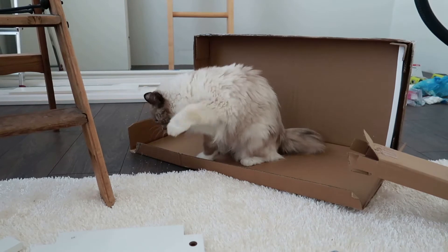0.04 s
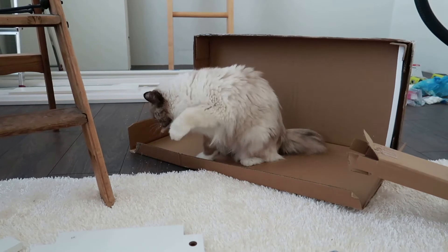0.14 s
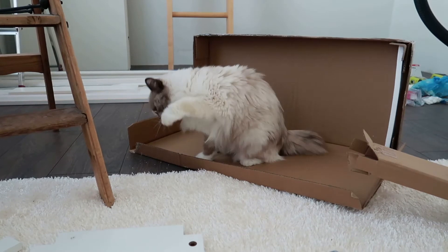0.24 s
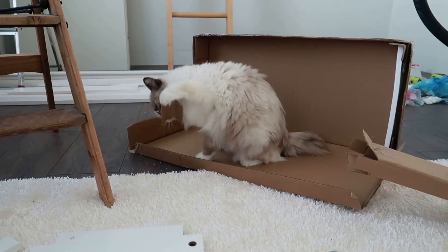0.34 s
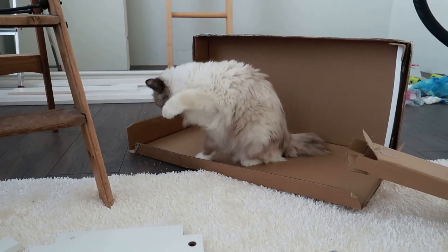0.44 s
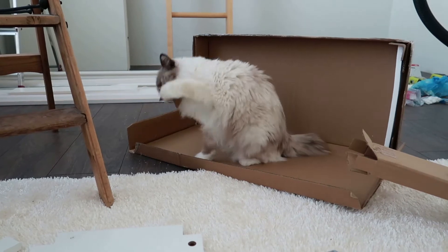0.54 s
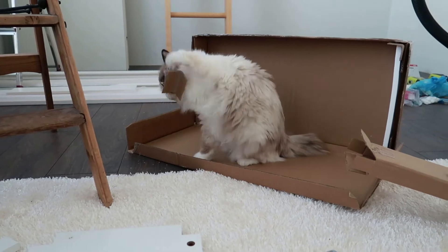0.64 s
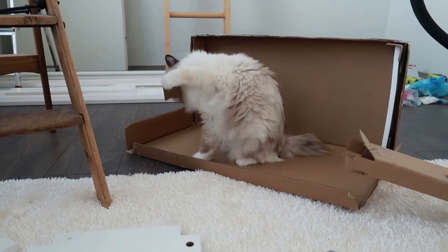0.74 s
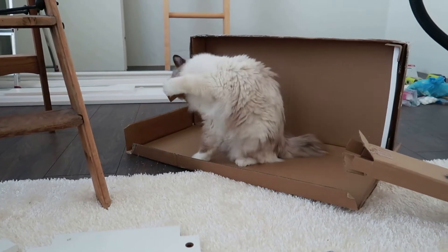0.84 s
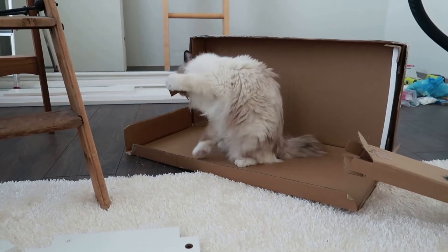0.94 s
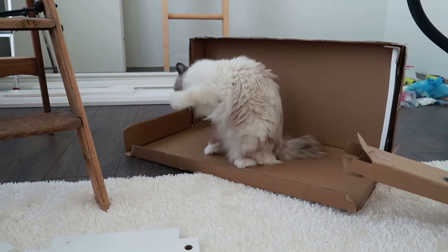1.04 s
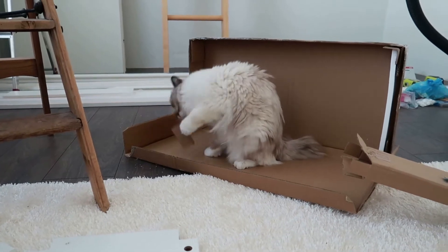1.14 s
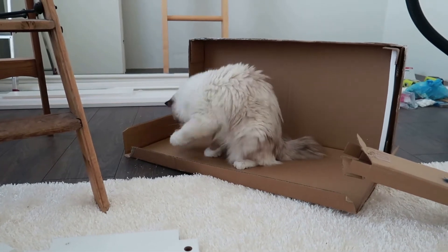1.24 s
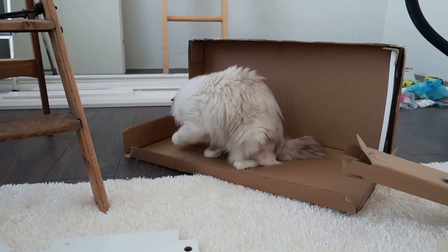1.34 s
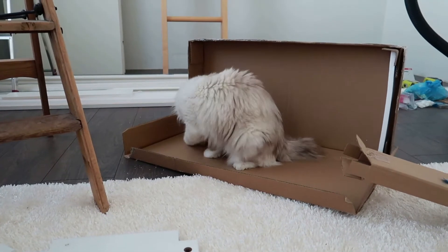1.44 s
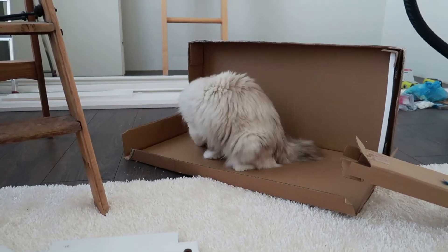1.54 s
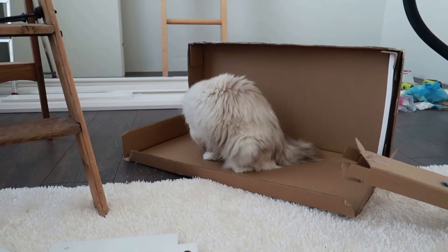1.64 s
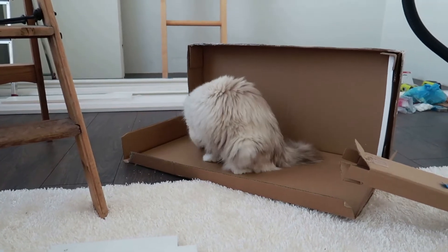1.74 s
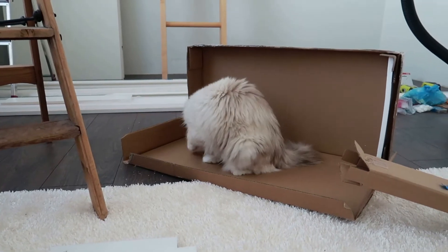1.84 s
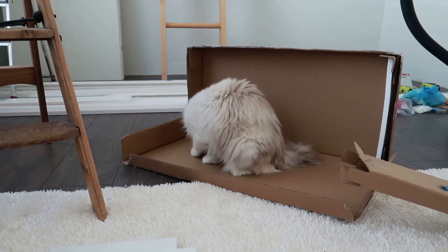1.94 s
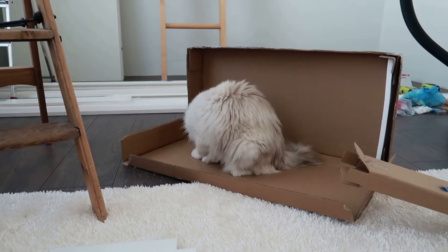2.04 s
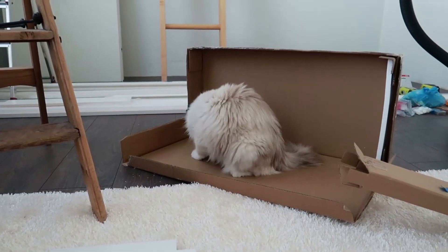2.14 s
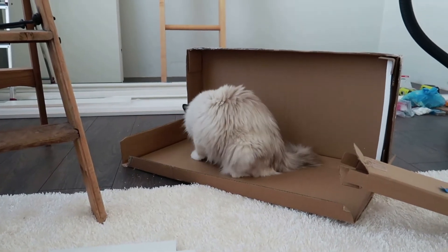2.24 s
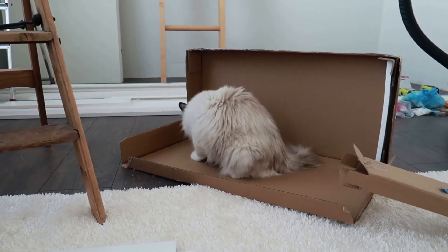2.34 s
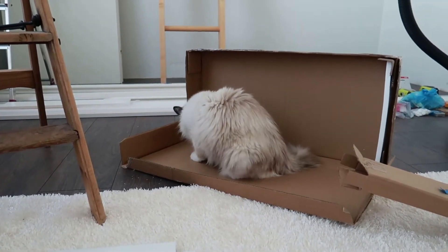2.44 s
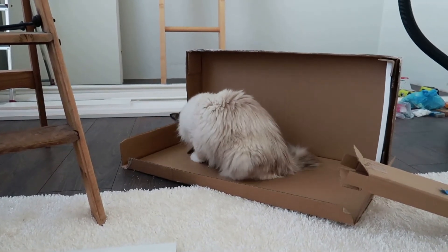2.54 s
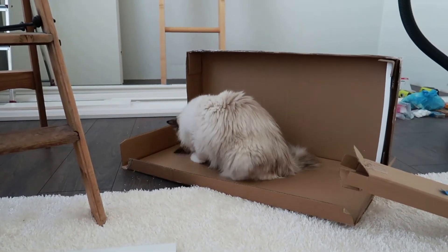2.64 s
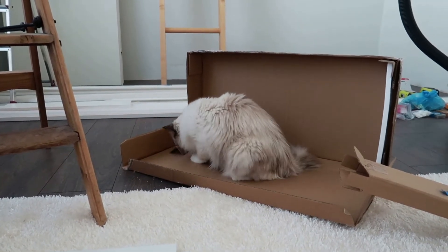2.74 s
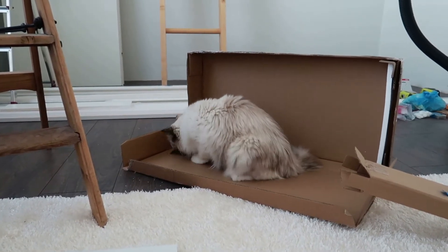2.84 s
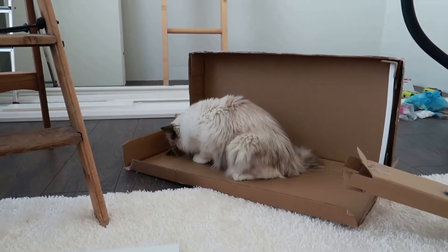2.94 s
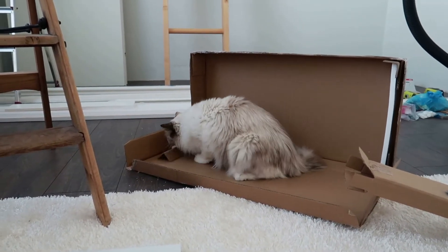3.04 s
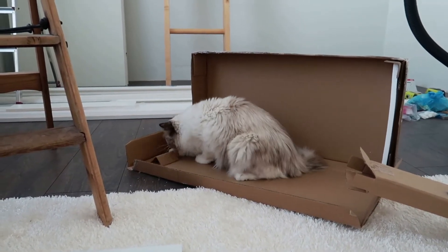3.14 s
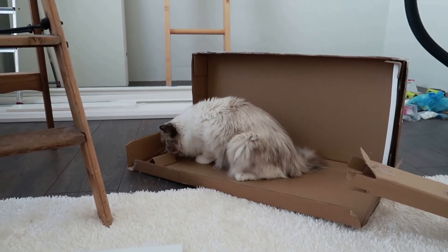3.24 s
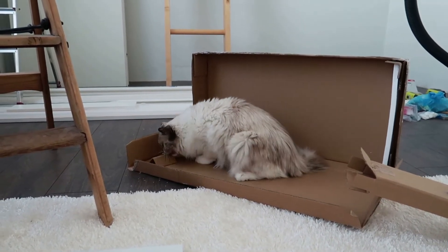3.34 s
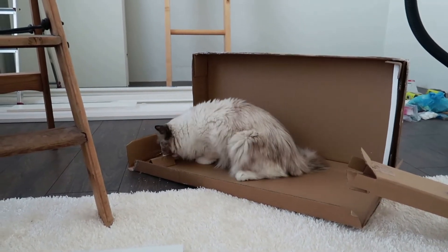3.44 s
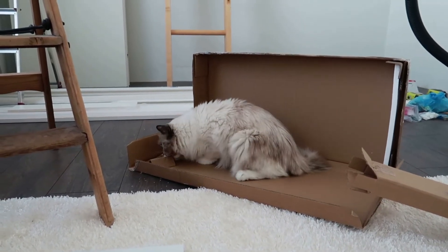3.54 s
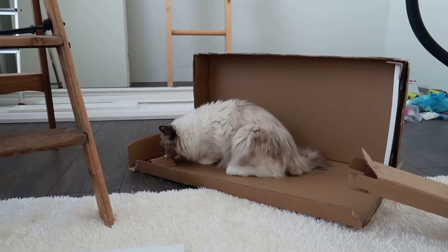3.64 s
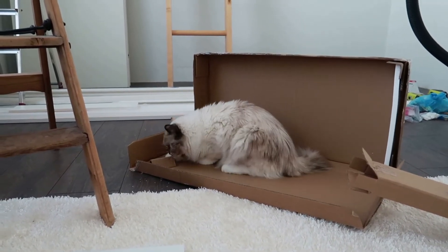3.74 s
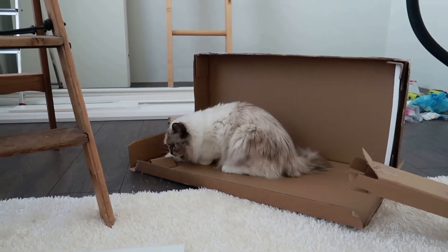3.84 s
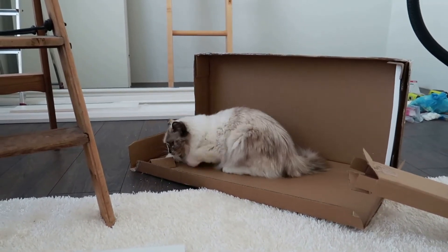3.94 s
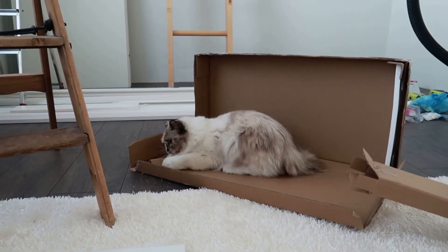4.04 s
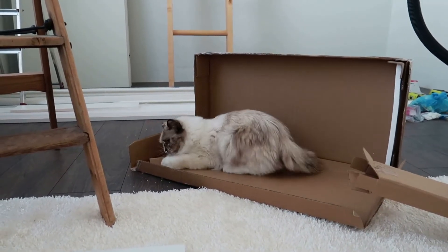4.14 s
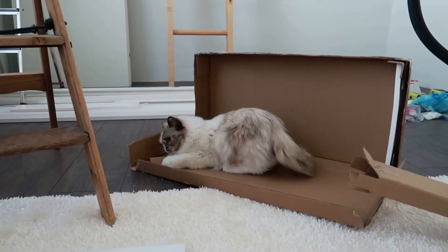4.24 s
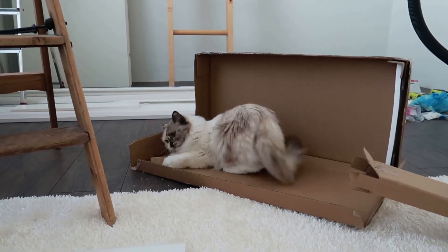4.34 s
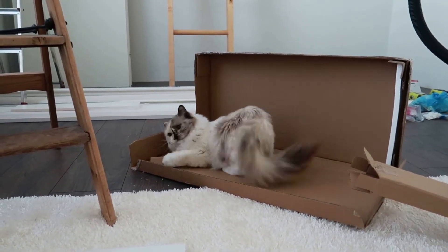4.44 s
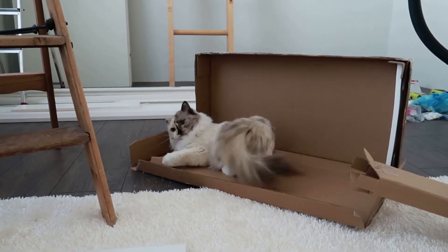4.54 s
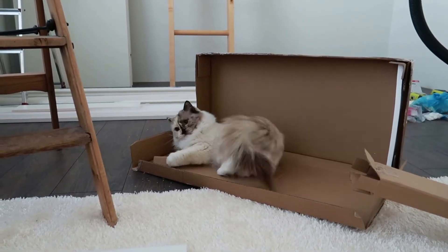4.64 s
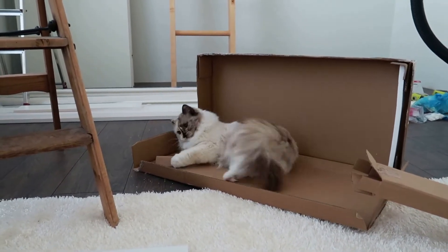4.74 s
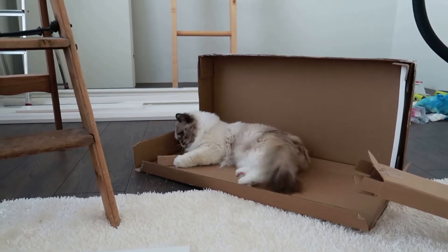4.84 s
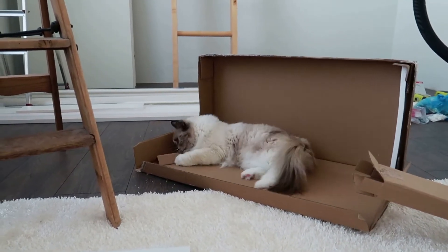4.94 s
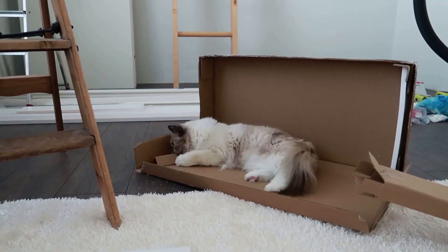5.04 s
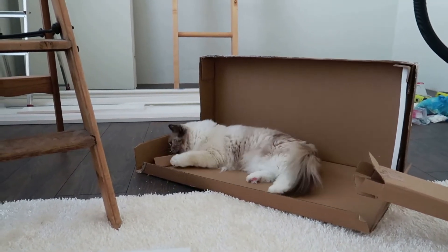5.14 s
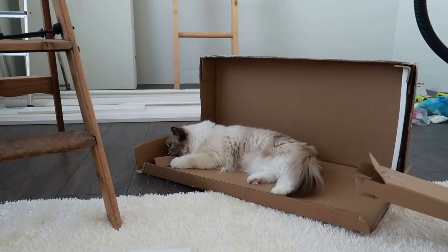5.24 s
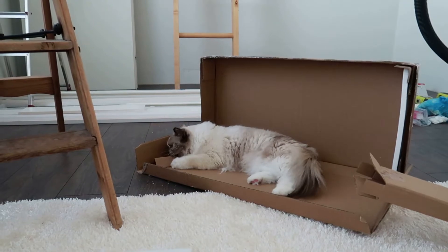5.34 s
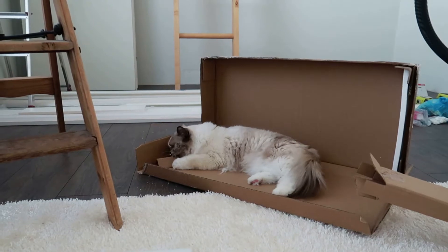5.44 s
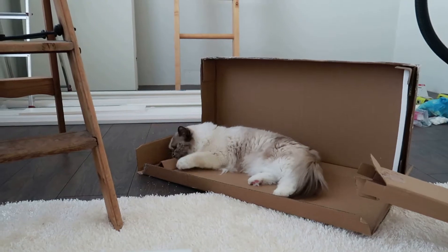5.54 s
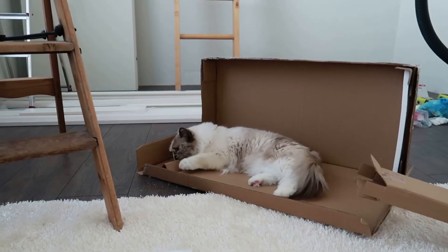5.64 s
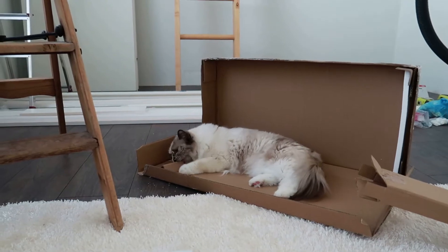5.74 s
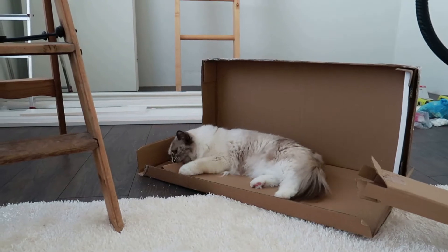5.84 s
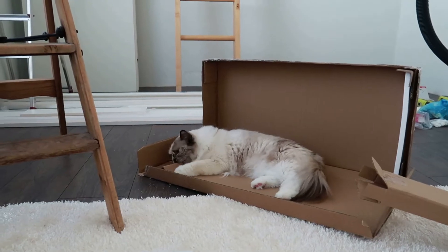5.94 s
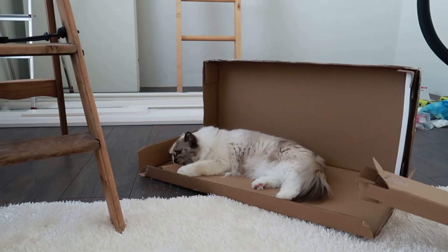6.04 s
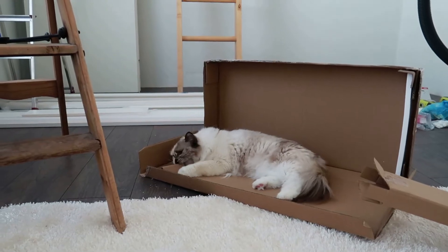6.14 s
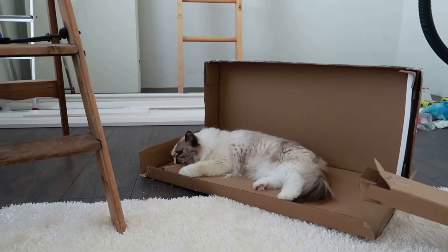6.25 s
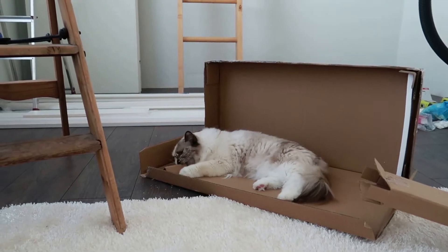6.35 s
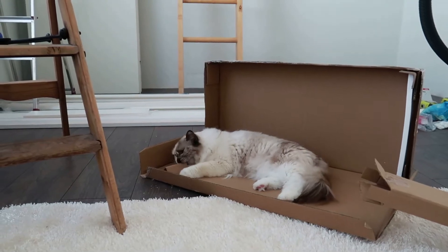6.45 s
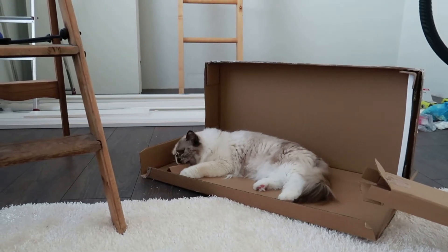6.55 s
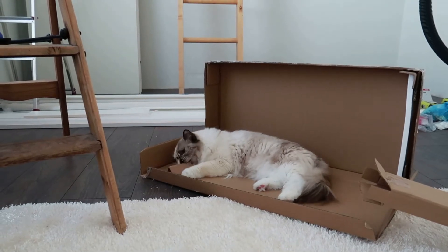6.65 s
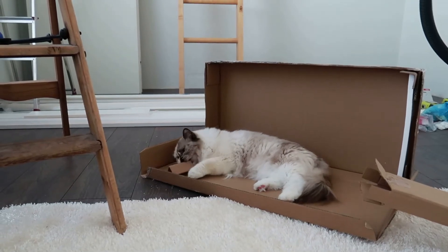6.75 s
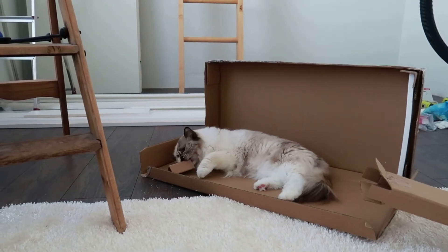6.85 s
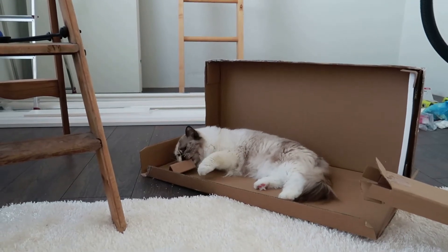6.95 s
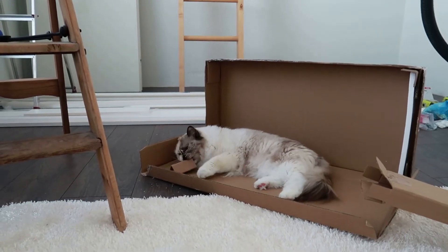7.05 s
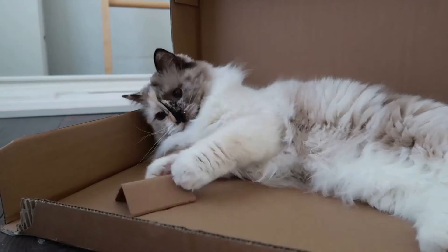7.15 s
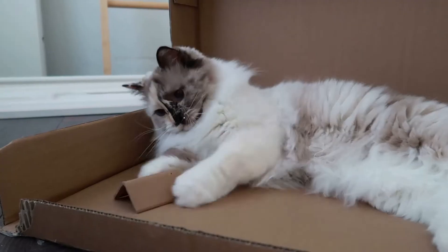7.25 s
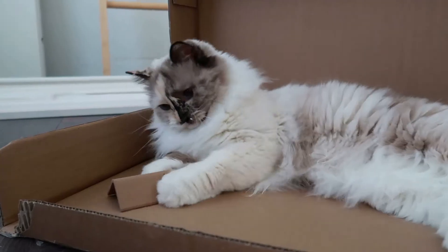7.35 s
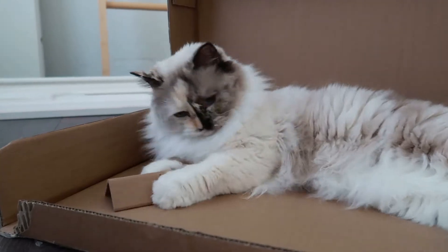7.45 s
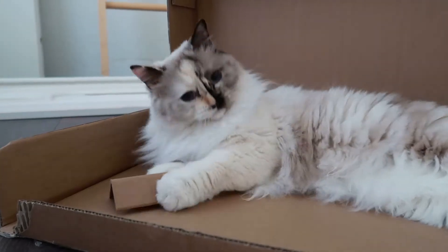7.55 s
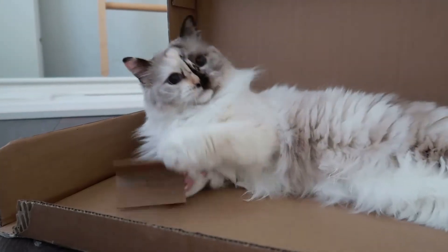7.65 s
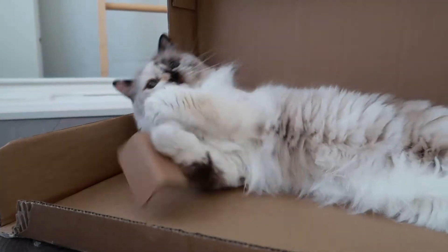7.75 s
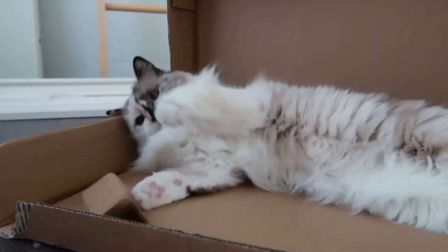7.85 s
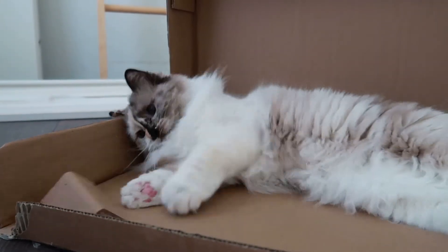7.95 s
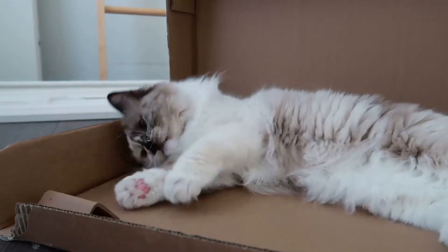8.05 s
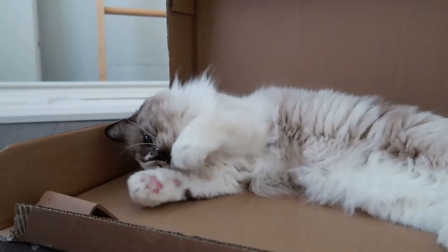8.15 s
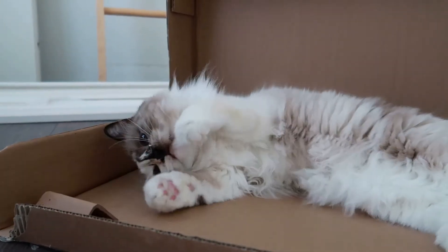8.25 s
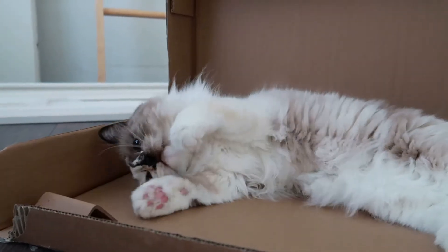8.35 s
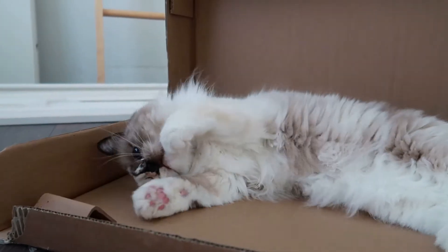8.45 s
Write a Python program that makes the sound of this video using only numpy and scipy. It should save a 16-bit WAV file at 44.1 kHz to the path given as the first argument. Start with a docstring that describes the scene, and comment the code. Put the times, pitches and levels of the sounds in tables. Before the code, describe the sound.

A paw thumps and scrapes hard on hollow cardboard, then soft fur rustles, and finally a loose folded piece is batted with rapid clacks.

```python
"""A cat paws and knocks on a shallow cardboard box on the floor of a bare room, and rubs its fur against it.
Each knock is a snap and some grit that ring the short modes of the board; later a loose folded piece is batted.
Claws tick on a stiff edge; fur and claws drag over the fibres as thousands of small slips a second.
Two close microphone ports hear the room as a diffuse field; air noise and mains hum lie below."""
import sys
import numpy as np
from scipy import signal
from scipy.fft import rfft, irfft, next_fast_len
from scipy.io import wavfile

SR = 44100
rng = np.random.default_rng(int(sys.argv[2]) if len(sys.argv) > 2 else 0)


def natural_amplitude(level_db):
    """Convert a level in decibels to a linear amplitude factor, elementwise."""
    exponent = np.asarray(level_db, float) / 20
    return 10 ** exponent


def to_wav(sig):
    """Store sig (one row per channel, or 1-D mono) as 16-bit WAV at the path in sys.argv[1].

    Samples outside -1..1 are clipped; the rate is SR.
    """
    pcm = np.clip(np.atleast_2d(sig), -1, 1) * 32767
    pcm = np.round(pcm).astype(np.int16)
    wavfile.write(sys.argv[1], SR, pcm.T)  # frames by channels


N = 375222  # samples
T = np.arange(N) / SR  # s
FREQ = np.maximum(np.fft.rfftfreq(N, 1 / SR), 10)  # Hz, kept above zero for the logarithms


def rms_one(x):
    """Scale to rms 1."""
    return x / np.sqrt(np.mean(x ** 2) + 1e-20)


def at_hz(points, hz):
    """Read a table on a log-frequency axis."""
    table_hz, value = np.transpose(points)
    return np.interp(np.log(hz), np.log(table_hz), value)


def shape(x, gain):
    """Weight the spectrum of a whole signal."""
    return irfft(rfft(x) * gain, N)


def drift(rate_hz):
    """Slow random wander of rms 1, made of noise that fades above rate_hz."""
    gain = 1 / (1 + (np.fft.rfftfreq(N, 1 / SR) / rate_hz) ** 2)
    return rms_one(shape(rng.standard_normal(N), gain))


def ring(drive, hz, t60):
    """A mode of the board: a unit click sets a decaying sine of starting height 1 ringing."""
    radius = natural_amplitude(-60 / (t60 * SR))
    turn = 2 * np.pi * hz / SR
    return signal.lfilter([0, np.sin(turn)], [1, -2 * radius * np.cos(turn), radius * radius], drive)


def diffuse(most_alike):
    """Sound from all sides: alike at both ports in the bass, unrelated or opposed in the treble."""
    port_gap_m, sound_speed = 0.017, 343  # m, m/s
    return most_alike * np.sinc(2 * FREQ * port_gap_m / sound_speed)


def at_ports(mid, side, alike):
    """Share two unrelated signals out so that the ports agree to the given degree at each frequency."""
    alike = np.clip(alike, -1, 1)
    mid = shape(mid, np.sqrt(1 + alike))
    side = shape(side, np.sqrt(1 - alike))
    return np.array([mid + side, mid - side]) / np.sqrt(2)


def lagged(x, left_lag_us, left_db):
    """Direct sound reaches the two ports with a small difference in time and in level."""
    half_lag = np.exp(-1j * np.pi * FREQ * left_lag_us * 1e-6)
    left = natural_amplitude(left_db / 2) * shape(x, half_lag)
    right = natural_amplitude(-left_db / 2) * shape(x, 1 / half_lag)
    return np.array([left, right])


def knocks(rows, modes, cut_hz):
    """Each knock is a snap followed by the grit of the contact; where it lands sets which modes ring."""
    # Centres of the three strengths of a knock, in Hz.
    share_hz = [250, 550, 1700]
    top_fall_db = -4.5  # per octave above the last centre
    t = T[:1024]
    starts = np.round(rows[:, 0] * SR).astype(int)
    contact_s = np.clip(rows[:, 4:], 0.05, 6) / 1000

    swell = t / contact_s * np.exp(-t / contact_s)
    grit = rng.standard_normal((len(rows), len(t))) * swell
    grit = grit / np.sqrt(np.sum(grit ** 2, axis=1, keepdims=True))
    grit_share = contact_s / (contact_s + 0.002)  # long contacts are mostly grit
    snap = -1.0 * (t == 0)
    force = np.sqrt(grit_share) * grit + np.sqrt(1 - grit_share) * snap

    out = np.zeros(N)
    for k, (hz, level_db, t60) in enumerate(modes):
        mode_db = top_fall_db * max(np.log2(hz / share_hz[-1]), 0) + level_db - 7.5
        drive = np.full(N + len(t), 1e-18)
        for start, row, push in zip(starts, rows, force):
            strength_db = np.interp(np.log(hz), np.log(share_hz), row[1:4])
            drive[start:start + len(t)] += natural_amplitude(strength_db + mode_db) * push
        sign = 1 if hz < 600 else (-1) ** k  # the low modes all start the same way: a thump
        out += sign * ring(drive[:N], hz, t60)
    # a thin sheet radiates no deep bass
    return signal.sosfilt(signal.butter(4, cut_hz, "high", fs=SR, output="sos"), out)


def ticks():
    """A claw tip lets go of a stiff edge: one click into a few bright modes."""
    # Each row: time in seconds (the click comes 1.5 ms later), relative strength in dB,
    # lean to the high modes in dB per octave.
    claw_rows = [(0.7953, -36.5, 7.5), (4.1696, -35.5, -10), (4.485, -41, -1), (5.3004, -32, -1.5)]
    # Modes of the edge. Each row: frequency in Hz, relative level in dB, decay by 60 dB in seconds.
    edge_modes = [(1365, -4, 0.073), (1510, 0.5, 0.045), (2080, 2, 0.036), (2520, -15, 0.018),
                  (3065, 6, 0.019), (3700, -10, 0.02)]
    s, strength_db, lean_db = np.transpose(claw_rows)
    at = np.round((s + 0.0015) * SR).astype(int)
    out = np.zeros(N)
    for k, (hz, level_db, t60) in enumerate(edge_modes):
        clicks = np.full(N, 1e-18)
        clicks[at] = natural_amplitude(strength_db + level_db - 10.0 + lean_db * np.log2(hz / 2000))
        out += (-1) ** k * ring(clicks, hz, t60)
    return out


def strokes():
    """Power of the four parts of the drag: each stroke swells to its strongest moment and falls away."""
    # Strokes of fur and claws. Each row: strongest moment in seconds, rise in seconds, fall in seconds,
    # relative level in dB, hollow part against the middle in dB, brightness against the middle in dB.
    stroke_rows = [(0.87, 0.069, .03, -61, 2, -5), (1.14, .015, 0.12, -59.5, 0.5, -15),
                   (1.281, 0.015, 0.15, -28, 2, -16), (1.404, 0.025, .12, -40.5, 10.5, -14),
                   (1.478, 0.022, 0.024, -46, 16.5, 0.5), (1.565, 0.073, .24, -31, 2.5, -10),
                   (2.05, 0.017, 0.17, -53.5, -3.5, -2), (2.44, .04, 0.3, -55, 7, 2.5),
                   (2.56, 0.2, 0.25, -55, -3, -13), (2.72, 0.34, 0.19, -48, 5, 1.5),
                   (3.0, 0.059, 0.57, -61.5, 8.5, 10), (3.24, 0.46, 0.15, -47, 1.5, -1),
                   (3.51, 0.073, 0.27, -52, 2.5, -1.5), (3.72, 0.094, 0.31, -63, 4.5, 6.5),
                   (4.05, 0.077, 0.23, -59.5, -1.5, -8), (4.189, 0.037, 0.14, -47, -10, -6.5),
                   (4.44, 0.028, 0.14, -64, -5, 12), (4.49, 0.018, 0.53, -49.5, -3.5, -5.5),
                   (4.74, 0.13, 0.17, -46, -4, -3.5), (4.96, 0.15, 0.27, -44, -1.5, -3),
                   (5.136, .06, 0.21, -50.5, 1, -4), (5.309, 0.021, 0.23, -50.5, -1, -7.5),
                   (5.62, 0.12, 0.21, -49, 1.5, -1), (5.72, 0.21, 0.31, -48, -3, -5),
                   (6.14, 0.078, 0.27, -51.5, -5, -9), (6.45, 0.41, 0.27, -59, -3, -17),
                   (6.652, 0.056, 0.24, -49.5, 0.2, -5.5), (7.0, 0.14, .07, -60.5, -8, -15),
                   (7.15, 0.024, 0.16, -45, -1.5, -10), (7.209, 0.091, 0.24, -41.5, -2, -6),
                   (7.351, 0.012, 0.087, -32, -4, -3.5), (7.42, 0.037, 0.21, -49.5, 2, -0.5),
                   (7.725, 0.17, .1, -39.5, -5.5, -2.5), (7.8, .05, .2, -51.5, -9, -5),
                   (7.989, 0.019, 0.22, -37, 6, -6.5)]
    edge_db, roundness = -22, 1.32  # level at the ends of rise and fall; 1 = pointed, 2 = rounded
    hiss_db, hiss_follows = -5, 0.95  # fine hiss against the middle, and its share of the brightness
    power = np.zeros((4, N))
    for s, rise, fall, level_db, hollow_db, bright_db in stroke_rows:
        near = slice(int((s - 2 * rise) * SR), int((s + 2 * fall) * SR))
        away = np.maximum((s - T[near]) / rise, (T[near] - s) / fall)
        parts_db = np.array([[hollow_db], [0], [bright_db], [hiss_db + hiss_follows * bright_db]])
        power[:, near] += natural_amplitude(level_db + parts_db + edge_db * away ** roundness) ** 2
    return power


def moving_note(x, hz, width_hz):
    """A narrow resonance whose centre follows hz: ring at the mean centre, then slide the pitch."""
    mean_hz = hz.mean()
    resonance = 1 / (1 + (2 * (FREQ - mean_hz) / width_hz) ** 2)
    ringing = signal.hilbert(shape(x, resonance), next_fast_len(N))[:N]
    slide = np.exp(2j * np.pi * np.cumsum(hz - mean_hz) / SR)
    return rms_one(np.real(ringing * slide))


def rubs():
    """Fibres catch and let go thousands of times a second; the box colours the slips."""
    # Colour of the drag. Each row: frequency in Hz, relative density in dB per Hz.
    drag_colour = [(88, -39), (150, -2.5), (318, 0), (441, -5), (567, 0), (1090, -8), (2060, -5),
                   (2400, -4.5), (5610, -12.5), (9000, -22.5), (12100, -25.5), (15000, -29.5)]
    # Resonances of the box under the drag. Each row: frequency in Hz, width in Hz, lift in dB.
    box_peaks = [(320, 88, 4.5), (1386, 150, 4.5), (2073, 108, 10), (3090, 210, 3), (3700, 140, 4.5),
                 (4230, 58, 2.5), (5840, 160, 3)]
    # Borders between the four parts of the drag, in Hz.
    part_hz = [1000, 2600, 5500]
    # Note of the free part of the board. Each row: time in seconds, frequency in Hz.
    hollow_note = [(1.2, 570.7), (1.4, 715.2), (1.62, 559.6), (2.43, 680), (2.74, 546.1), (3.0, 649.2),
                   (3.6, 605), (4.2, 691.8), (4.4, 597.5), (4.74, 740.3), (4.94, 760.6), (5.1, 649.9),
                   (5.4, 543.8), (5.63, 711.4), (5.9, 600), (6.65, 720), (6.85, 579.1), (7.4, 711)]
    gain = natural_amplitude(at_hz(drag_colour, FREQ))
    for hz, width, lift_db in box_peaks:
        gain = gain * natural_amplitude(lift_db / (1 + (2 * (FREQ - hz) / width) ** 2))

    sizes = natural_amplitude(2.0 * np.minimum(rng.exponential(1, (2, N)), 5)) * rng.choice([-1, 1], (2, N))
    slips = sizes * (rng.random((2, N)) < 5000.0 / SR)  # 5000 slips a second on average
    wide = at_ports(*slips, diffuse(1.0))  # the whole flank touches: a wide source

    below = [1 / (1 + (FREQ / hz) ** 8) for hz in part_hz]
    bands = np.diff([0 * FREQ, *below, 1 + 0 * FREQ], axis=0)
    hollow, middle, papery, hiss = (rms_one(shape(wide, gain * band)) for band in bands)
    # the free part of the board changes as the weight shifts, and its note moves with it
    note_hz = np.interp(T, *np.transpose(hollow_note))
    hollow = hollow + natural_amplitude(-2.5) * moving_note(slips[0], note_hz, width_hz=84.0)

    out = 0
    for part, power in zip((hollow, middle, papery, hiss), strokes()):
        flicker = natural_amplitude(1.58 * drift(8.1))  # each part flickers on its own
        out = out + np.sqrt(power) * flicker * part
    return natural_amplitude(1.14 * drift(33)) * out  # pressure on the board wavers


def room(x, onset_s, build_s):
    """Reflections: noise that builds up after the first wall echo and dies band by band."""
    # Each row: frequency in Hz, decay by 60 dB in seconds.
    decay_rows = [(100, 0.14), (300, 0.6), (2000, 0.63), (8000, 0.43), (14000, 0.31)]
    # Colour of the reflections. Each row: frequency in Hz, relative level in dB.
    wall_colour = [(100, -5), (300, -6.5), (550, -5), (1200, -5.5), (2100, -4), (3100, -6), (4500, -11.5),
                   (8000, -6.5), (13000, -14)]
    tail = T[:SR]
    field = at_ports(*rng.standard_normal((2, N)), diffuse(0.995))
    colour = natural_amplitude(at_hz(wall_colour, FREQ))
    answer = 0
    for hz in 62.5 * 2.0 ** np.arange(9):  # overlapping octave bands
        octave = np.cos(np.pi / 2 * np.clip(np.log2(FREQ / hz), -1, 1)) ** 2
        band = shape(field, colour * octave)[:, :SR]
        answer = answer + band * natural_amplitude(-60 * tail / at_hz(decay_rows, hz))
    far_wall = natural_amplitude(3.6 * np.exp(-((tail - 0.032) / 0.0021) ** 2))  # a cluster of echoes stands out
    build_up = np.clip((tail - onset_s) / build_s, 0, 1)
    answer = answer * far_wall * build_up
    return signal.fftconvolve(np.atleast_2d(x), answer / np.sqrt(SR), axes=1)[:, :N]


def background():
    """Steady air and microphone noise, and mains hum at twice the line frequency with its neighbours."""
    # Colour of the noise. Each row: frequency in Hz, relative density in dB per Hz.
    air_colour = [(15, -63), (25, -11.5), (55, -1.5), (104, -7.5), (119, -5), (156, -4), (253, -6.5),
                  (399, -6.5), (523, -11.5), (2170, -21), (4260, -26), (12500, -40.5), (15500, -52)]
    # How alike the noise is at both ports, the microphones' own hiss being unrelated.
    # Each row: frequency in Hz, likeness from 0 to 1.
    air_alike = [(30, 0.96), (100, 0.87), (300, 0), (1000, 0), (4000, 0.3), (12000, 0)]
    # Strength of the main hum before it wanders. Each row: time in seconds, rms level in dB.
    hum_level = [(0, -61.5), (1.2, -64.5), (1.9, -57), (2.8, -57), (3.6, -53.5), (4.4, -57), (5.2, -54),
                 (6.0, -55.5), (7.0, -58), (7.2, -62), (8.5, -83)]
    # The other hum lines before they wander. Each row: frequency in Hz, rms level in dB.
    side_lines = [(50, -66.5), (150, -67)]
    air = at_ports(*rng.standard_normal((2, N)), at_hz(air_alike, FREQ))
    air = shape(air, natural_amplitude(at_hz(air_colour, FREQ)))
    hum_db = np.interp(T, *np.transpose(hum_level)) + 1.0 * drift(7)
    hum = natural_amplitude(hum_db) * np.sin(2 * np.pi * 100 * T)
    for line_hz, line_db in side_lines:
        hum = hum + natural_amplitude(line_db + 3.3 * drift(2.3)) * np.sin(2 * np.pi * line_hz * T)
    return natural_amplitude(-51.5) * rms_one(air) + np.sqrt(2) * hum  # a sine of rms 1 peaks at root 2


def scene():
    """Knocks, ticks and rubs, direct and through the room, over the background."""
    # Knocks on the board. Each row: start in seconds, relative strength in dB in the modes near 250 Hz,
    # near 550 Hz and near 1700 Hz, contact time in ms.
    knock_rows = np.array([(1.2655, -9.5, -24, -5, 0.54), (1.2713, -1.5, -15.5, -23, 2.7),
                           (1.3983, -14, -24, -16.5, 0.85), (1.4746, -11.5, -41, -23.5, 0.49),
                           (1.5234, -35, -21.5, -17, 0.98), (1.5549, -34, -24, -29, 1.2),
                           (1.5665, -36, -9, -13, 0.58), (2.0462, -55, -53, -43, 0.4),
                           (3.1448, -39, -42, -46, 1.5), (4.4853, -39, -68, -39, 2.2),
                           (5.365, -37, -48, -55, 3.1), (7.229, -24.5, -23.5, -23, 4.2),
                           (7.3428, -41, -15, -7.5, 0.22), (7.3703, -29, -29, -25, 1.6),
                           (7.4, -35, -17.5, -30, 2.1), (7.742, -48, -35, -26, 0.35),
                           (7.8867, -6, -10.5, -2, 0.097), (7.9142, -16, -35, -11.5, 2),
                           (7.9455, -3.5, -13, -2, 0.34), (7.9582, 0.5, -20.5, -1.5, 0.51),
                           (7.9759, -6, -16, -6.5, 0.58), (7.981, -4, -20.5, -8, 0.41),
                           (8.0679, -19, -21, -14.5, 0.92), (8.096, -23, -0.5, -4, 0.93),
                           (8.1005, -7, -17, 4.5, 0.43)])
    # Modes of the box. Each row: frequency in Hz, relative level in dB, decay by 60 dB in seconds.
    board_modes = [(166, -8, 0.044), (244, -7.5, 0.065), (307, -1, 0.027), (346, 1.5, 0.051),
                   (425, -3, .045), (493, 8.5, 0.037), (514, -13, 0.47), (600, 1, 0.036), (726, 2.5, 0.044),
                   (843.4, 5.5, 0.047), (940, 3, 0.013), (1054, -3.5, 0.03), (1350, -2, 0.0086),
                   (1510, -11, 0.019), (1880, 6.5, 0.0055), (2005, 1, 0.018), (2160, 6.5, 0.0031),
                   (2800, -1, 0.0097), (2990, -1, 0.0044), (3800, 0.5, 0.01), (4330, 2, 0.0028),
                   (5070, 6, 0.0025), (5930, 4.5, 0.0018), (9000, -4.5, 0.00064), (11100, -6, 0.00094)]
    # Modes of the loose folded piece of board that the cat bats about later.
    # Each row: frequency in Hz, relative level in dB, decay by 60 dB in seconds.
    piece_modes = [(52, 5, 0.1), (157.3, -13.5, 0.078), (257, -17, 0.07), (308, 2.5, 0.047),
                   (408, 3, 0.036), (514, -6, 0.025), (668, -10, 0.038), (788, 5.5, 0.014),
                   (953, 2.5, 0.016), (1060, -0.5, 0.021), (1293, 0.5, 0.016), (1490, 2.5, 0.012),
                   (1655, 1, 0.012), (2030, 0, 0.0086), (2250, 0, 0.0098), (2510, 6, 0.0031),
                   (3250, 3.5, 0.004), (3740, 1, 0.0034), (4730, 1, 0.0028), (5470, -1, 0.0037),
                   (6400, -1.5, 0.0038), (8200, -3.5, 0.0011), (12200, -2, 0.0013)]
    on_piece = knock_rows[:, 0] >= 7.1  # s; from here on the knocks fall on the loose piece
    box = knocks(knock_rows[~on_piece], board_modes, cut_hz=134.0) + ticks()
    piece = knocks(knock_rows[on_piece], piece_modes, cut_hz=128.0)
    drag = natural_amplitude(-2.0) * rubs()
    direct = lagged(box, left_lag_us=-14.0, left_db=0.2) + drag
    direct = direct + lagged(piece, left_lag_us=-32, left_db=0.0)  # the later knocks sound from further to one side
    into_room = natural_amplitude(17.0) * box + natural_amplitude(12.5) * piece + natural_amplitude(11.0) * drag.mean(axis=0)
    wet = room(into_room, onset_s=0.0018, build_s=0.0087)
    return direct + wet + background()


def roll_off(x):
    """The treble ends steeply here."""
    return signal.sosfilt(signal.butter(12, 15770, fs=SR, output="sos"), x)


def record(dry):
    """The deep bass and the top are cut, and peaks are rounded."""
    dry = signal.sosfilt(signal.butter(2, 30, "high", fs=SR, output="sos"), dry)
    dry = signal.sosfilt(signal.cheby2(10, 50, 15700, fs=SR, output="sos"), dry)
    mix = 1.474 * np.tanh(dry / 1.53)
    return roll_off(mix)


dry = scene()
out = record(dry)
to_wav(out)
```